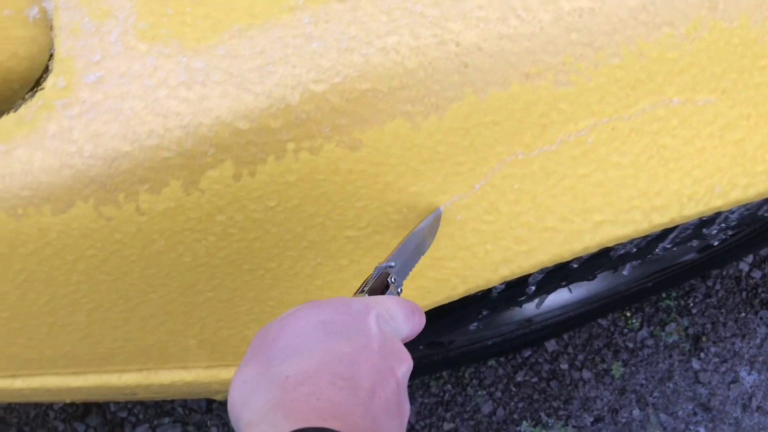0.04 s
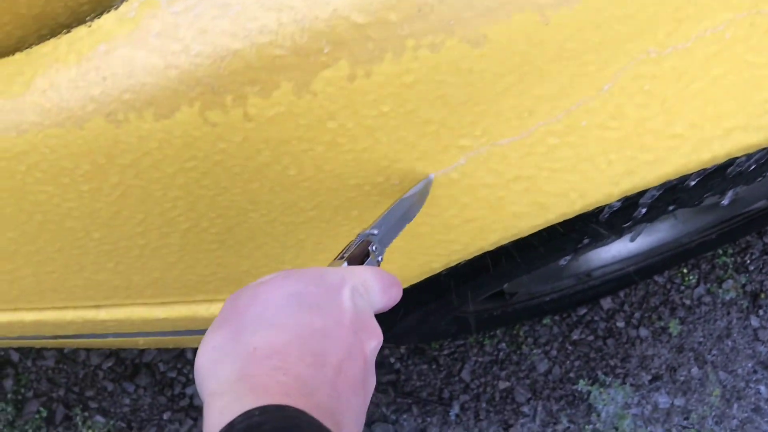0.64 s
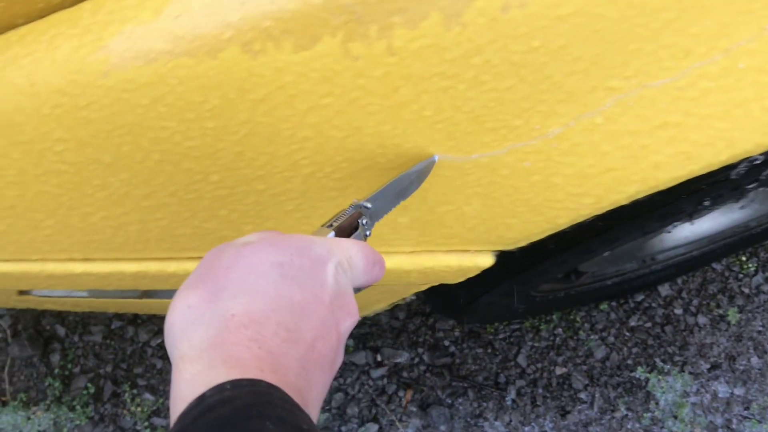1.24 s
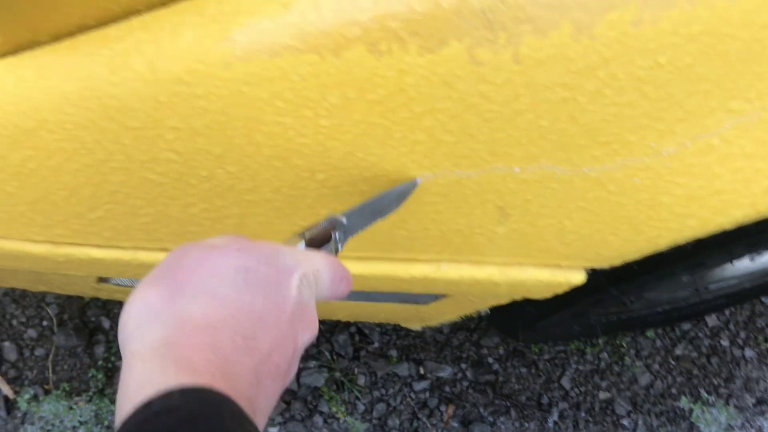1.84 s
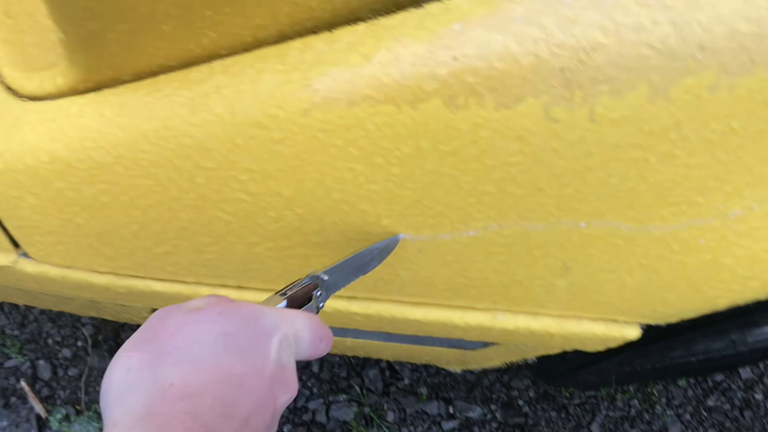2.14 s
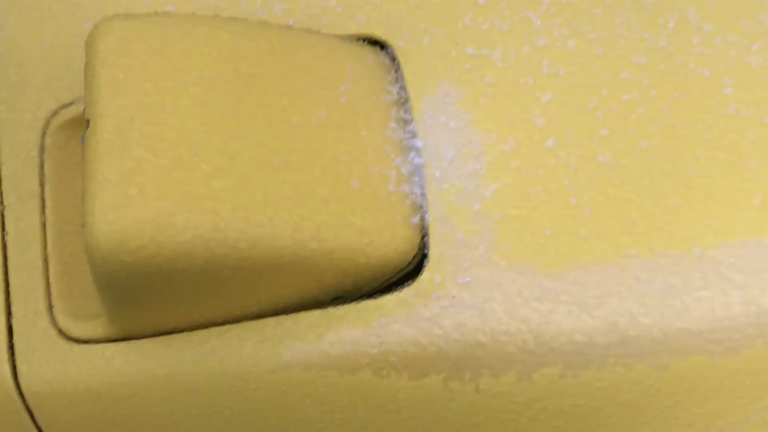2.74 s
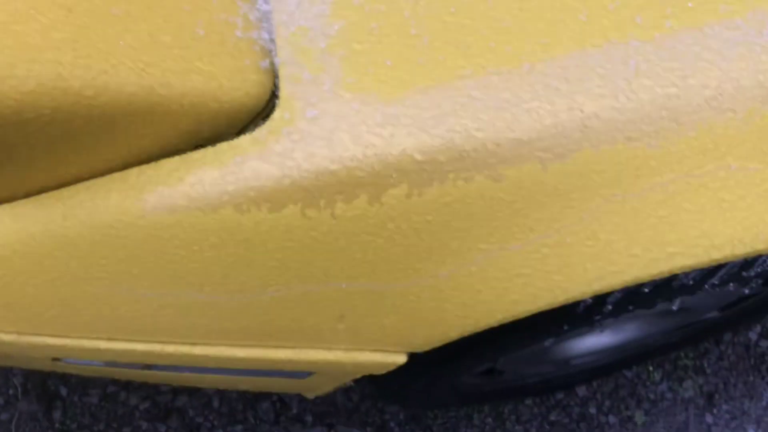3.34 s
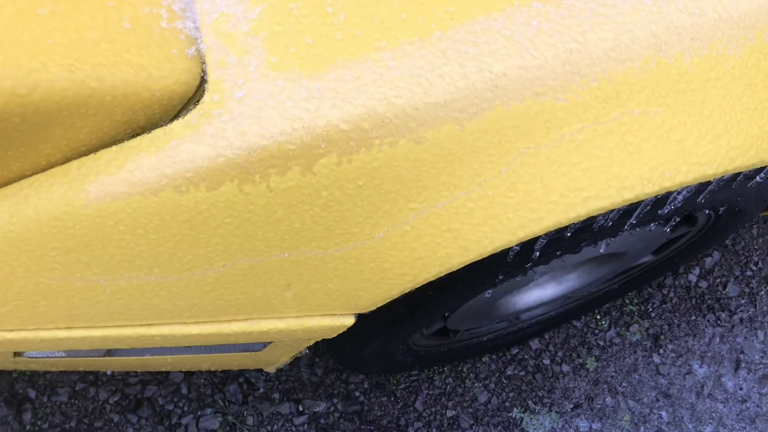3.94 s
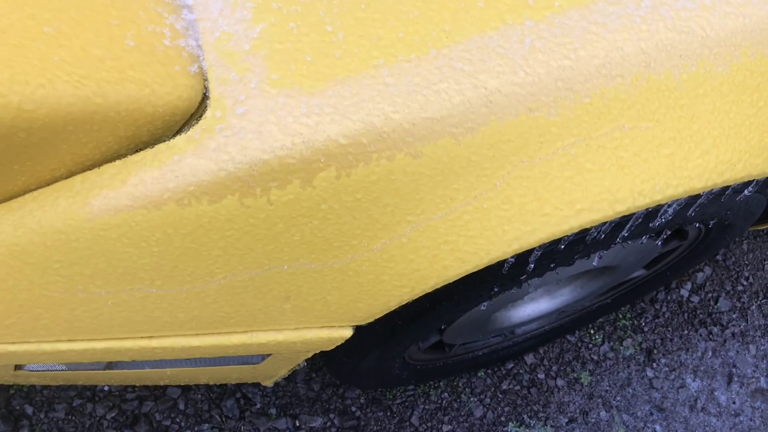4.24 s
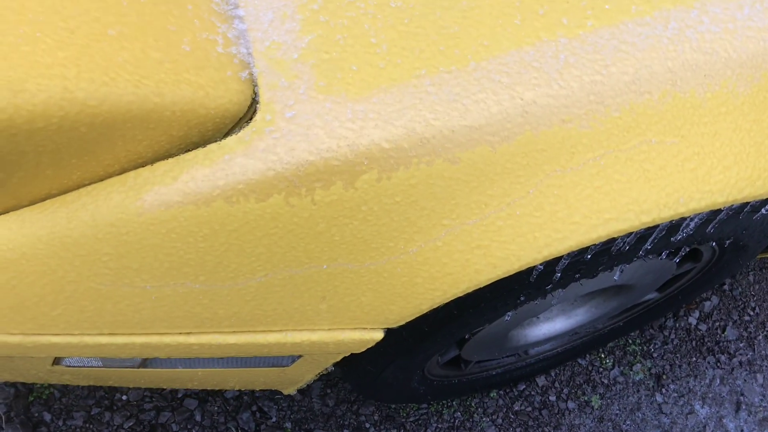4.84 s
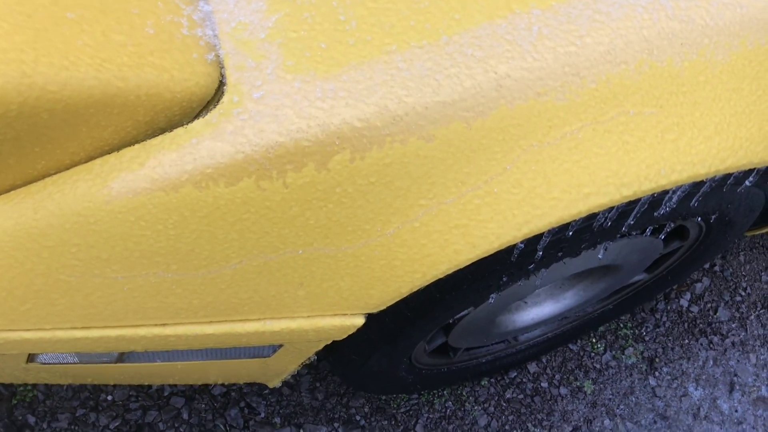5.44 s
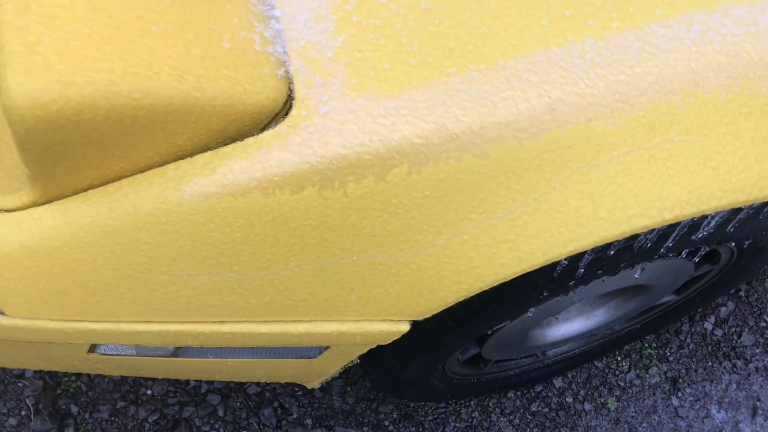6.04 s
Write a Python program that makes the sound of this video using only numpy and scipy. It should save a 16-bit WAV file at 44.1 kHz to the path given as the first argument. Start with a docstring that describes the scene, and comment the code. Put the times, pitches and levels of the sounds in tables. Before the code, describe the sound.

Close by and outdoors, a knife tip drags through gritty ice on a car's wing in four strokes. It sticks and slips in a rapid chatter, each slip crunching the ice, jarring the blade and knocking the sheet metal. The tip skids off with a brief hiss. A sleeve rustles with a few soft bumps, then tiny icy ticks and faint taps dot the quiet air.

```python
"""A knife tip is dragged in four strokes through gritty ice on a car's wing, close by, outdoors.
The tip chatters along, sticking and slipping, and now and then catches hard. Each slip crunches ice,
jars the blade and knocks the sheet metal; at last the tip skids off. Then the arm draws back with
soft bumps and a sleeve rustle, and tiny icy ticks and faint taps dot the quiet air."""
import sys
import numpy as np
from scipy import signal
from scipy.fft import rfft, irfft
from scipy.io import wavfile
from scipy.ndimage import uniform_filter1d

SR = 44100
rng = np.random.default_rng(int(sys.argv[2]) if len(sys.argv) > 2 else 0)


def output_pcm(signal):
    """Save a mono or channel-first signal as 16-bit PCM at the path in sys.argv[1].

    Samples are clipped to [-1, 1] before scaling.
    """
    pcm = np.clip(np.atleast_2d(signal).T, -1, 1) * 32767
    wavfile.write(sys.argv[1], SR, np.round(pcm).astype(np.int16))


N = 268128
TIME = np.arange(N) / SR

# Levels in the tables are relative: the functions set how loud each layer ends up.
# The hand's strokes, one list each. Each row: time in seconds, pressure in dB, slips a second.
STROKES = [
    [(.004, -1.5, 85), (.055, -6.5, 226), (.11, -15, 70), (.16, -0.5, 107), (.2, -6.5, 84.3),
     (.265, -1, 126), (.38, -5.5, 86.5), (.437, -0.5, 71)],
    [(.5014, -2, 50), (.565, -0.5, 117), (.65, -2.5, 109), (.675, -32.5, 40)],
    [(.8445, -4, 69), (.96, 1.5, 139.4), (1.025, 2, 59.3), (1.215, -3.5, 70.5), (1.24, -9, 84),
     (1.325, 1, 101), (1.385, -13.5, 50), (1.58, 0.5, 84), (1.625, 2, 97)],
    [(1.6836, -9.5, 28.5), (1.79, -15, 20.4), (1.91, -5, 73.6), (2.05, -5.5, 49.7), (2.115, 1, 97),
     (2.215, -7.5, 98.4), (2.245, 2.5, 93), (2.289, 4.5, 137)],
]
# The tip catches hard and breaks free. Each row: time in seconds, then crunch, blade and knock in dB.
CATCHES = [(.0041, -14.5, -26, -23), (0.0328, -23.5, -22, -24.5), (0.051, -15, -28.5, -19),
           (0.0842, -13, -24.5, -27), (0.1077, -17, -21.5, -20), (0.127, -18, -33, -27),
           (0.2403, -13.5, -28.5, -20), (.2546, -12, -19, -19), (0.2599, -20, -19, -23.5),
           (0.3007, -13.5, -24, -22), (0.3086, -22.5, -29, -30), (0.3429, -16, -26, -24),
           (.3671, -23, -28, -26), (0.3924, -22, -27, -25.5), (0.4377, -16.5, -27, -26),
           (0.5257, -20.5, -20, -25), (0.539, -16.5, -21, -30), (0.5912, -19.5, -17.5, -17.5),
           (0.6175, -17.5, -24, -21.5), (0.6312, -16.5, -20, -19), (0.6744, -21.5, -28.5, -17.5),
           (0.8595, -19, -18, -19.5), (0.8741, -25.5, -23, -35), (0.9026, -22.5, -22, -16),
           (0.9223, -16, -23, -19), (.949, -16, -22, -18.5), (.987, -21, -24, -21),
           (1.0099, -15.5, -25, -24.5), (1.047, -22.5, -27, -25), (1.1391, -18, -20.5, -18),
           (1.1658, -18.5, -17.5, -23), (1.1758, -17, -30, -17.5), (1.206, -18, -18.5, -18),
           (1.216, -18.5, -22.5, -30), (1.2776, -19.5, -22, -24), (1.325, -17.5, -16, -20.5),
           (1.338, -19.5, -21, -20.5), (1.3637, -21, -24.5, -15.5), (1.3975, -22.5, -17.5, -10.5),
           (1.4407, -22, -23.5, -19.5), (1.4634, -20.5, -18.5, -15), (1.5072, -20, -21, -17),
           (1.5286, -22, -27.5, -24.5), (1.548, -16.5, -15, -20.5), (1.5659, -21.5, -17.5, -24),
           (1.622, -24, -19.5, -13), (1.7017, -20, -21.5, -22.5), (1.7519, -18, -19, -15.5),
           (1.8152, -16, -19, -21), (1.8412, -18.5, -24, -12.5), (1.891, -20, -22.5, -17),
           (1.9055, -19.5, -29, -27), (1.932, -20, -27, -18.5), (1.9562, -16, -14.5, -10.5),
           (2.0128, -22.5, -20.5, -19.5), (2.0627, -23, -25, -16), (2.096, -18.5, -19, -24),
           (2.1107, -18, -25, -24.5), (2.1915, -21.5, -20.5, -16.5), (2.2572, -16.5, -17, -26)]
# Tone colours of ice and metal, on the stiff wheel arch and on the open panel behind it,
# and of the blade. Each row: frequency in Hz, level in dB.
ICE_ON_ARCH = [(1500, -37), (3700, -23.5), (5200, -1), (6200, -14.5), (7300, -6), (8100, -17.5),
               (8700, -3.5), (9200, -5.5), (10400, -15), (11500, -5), (12700, -2.5), (13400, -2.5),
               (14500, 1), (15300, -8.5), (16800, -31)]
ICE_ON_PANEL = [(1500, -54), (4200, -6), (4700, -8.5), (5750, -8), (6200, -3), (7500, -15.5), (8600, -12),
                (9450, -4), (10400, -9.5), (13000, -3), (13700, -2), (14500, 0.5), (15200, -1.5),
                (16000, -22.5), (16800, -27)]
ARCH_COLOUR = [(25, -38), (110, -20), (200, -3), (300, -6), (480, -7), (680, -3.5), (890, 5), (1150, 0.5),
               (1700, -11.5), (3500, -43.5)]
PANEL_COLOUR = [(25, -51), (125, -34.5), (165, -17), (205, -3), (290, -3.5), (380, -7.5), (490, -11.5),
                (680, -5), (900, 4), (1100, -1.5), (1400, -6), (1700, -16.5), (3500, -38)]
BLADE_COLOUR = [(300, -54), (1650, -17.5), (2000, -6), (2380, 1.5), (2700, -1.5), (3100, 1), (3550, -5),
                (3950, -10), (4600, -8.5), (5500, -18.5), (8000, -39.5)]
# The sheet metal's strongest notes. Each row: pitch in Hz, level in dB, seconds to fade by 60 dB.
PANEL_NOTES = [(193.7, -0.5, 0.32), (233, -2, 0.098), (272.6, 0.5, 0.2), (280.6, -6.5, 0.33),
               (330, -5.5, .14), (760, -2.5, 0.061), (885, -1, .08), (1043.3, 3, 0.079), (1094, 1.5, .08),
               (1180, -6, 0.064)]
# Bending waves bounce back from the panel's edges. Each row: delay in seconds, share that returns.
EDGE_ECHOES = [(.0023, 0.055), (.0039, -0.3), (.0056, -0.19)]
# Dense ringing of panel and blade. Each row: frequency in Hz, seconds to fade by 60 dB.
RING_TIMES = [(150, 0.36), (400, 0.098), (1000, 0.089), (2600, 0.04), (7000, 0.053), (15000, 0.014)]
# Tone colours of the air, skid, sleeve and frost. Each row: frequency in Hz, level in dB.
AIR_COLOUR = [(15, -39.5), (25, -2.5), (80, 1.5), (235, -10.5), (316, -9), (500, -17.5), (929, -17.5),
              (1470, -22.5), (4210, -22), (7630, -24.5), (10500, -25.5), (14200, -17), (15800, -26.5)]
SKID_COLOUR = [(30, -51.5), (100, -30), (220, -13.5), (500, -19.5), (900, -6.5), (1600, -13.5), (2400, 2.5),
               (3000, -5.5), (4200, -6.5), (7500, -8), (9400, -1), (10600, -8), (14500, 4), (15300, -3.5),
               (16000, -31)]
SLEEVE_COLOUR = [(60, -20.5), (200, -2.5), (370, 0.5), (700, -3.5), (1100, -5), (2000, -11.5),
                 (5000, -21.5), (15000, -33)]
FIZZ_COLOUR = [(1000, -1), (3500, -1), (7000, -2), (10500, -2.5), (14500, -4), (15600, -14), (16200, -27)]
# The last fast skid. Each row: time in seconds, level in dB, slips a second.
SKID = [(2.289, -30, 145), (2.295, -13, 218), (2.312, -14.5, 250), (2.33, -15, 300), (2.337, -10, 260),
        (2.34, -23, 220), (2.344, -25.5, 260)]
# Sleeve swishes. Each row: time of the peak in seconds, level in dB, seconds to fall to 37%.
SWISHES = [(2.369, -54.5, 0.038), (2.8, -54, 0.31), (3.113, -43.5, 0.029), (3.256, -54.5, 0.066),
           (4.1, -68, 0.73)]
# Soft bumps of the hand. Each row: time in seconds, level in dB, pitch in Hz, half length in seconds.
BUMPS = [(2.529, -43, 116, 0.01), (2.549, -35.5, 53, 0.017), (2.646, -48.5, 53.3, 0.038),
         (3.152, -40.5, 135, 0.0027)]
# Faint frosty fizz. Each row: time in seconds, level in dB.
FIZZ_LEVELS = [(2.36, -54), (2.85, -53.5), (3.3, -58.5), (3.55, -79), (3.8, -63.5), (4.35, -54), (4.7, -63),
               (6.08, -71.5)]
# The clearest icy ticks. Each row: time in seconds, level in dB, pitch in Hz.
CLEAR_TICKS = [(2.6834, -38, 11000), (2.778, -39, 2570), (2.8105, -38, 14000), (3.2994, -35, 14600),
               (3.3422, -36.5, 12300), (3.8637, -36, 11700), (4.0213, -38.5, 6160), (4.16, -38.5, 8400),
               (4.2544, -32, 4400), (4.7551, -38.5, 2410), (4.8804, -34.5, 11900), (4.974, -43, 3580),
               (5.1708, -30.5, 14100), (5.1931, -35.5, 14040), (5.2859, -33.5, 14200), (5.5844, -37, 13300),
               (5.9943, -36, 8570), (6.0244, -37, 14100)]
# Light taps on the bodywork. Each row: time in seconds, level in dB.
TAPS = [(3.832, -56), (4.074, -54), (4.684, -57), (4.947, -55), (5.221, -60), (5.824, -58)]

ARCH_UNTIL_S = .78  # the tip leaves the wheel arch
LEAD_S = .006  # a burst's faint creep starts this long before it breaks
STICK_S = .008  # the tip sticks this long before a hard catch


def amp(db):
    """Turns decibels into a gain."""
    return 10 ** (np.asarray(db) / 20)


def unit_rms(x):
    """Scales to an average power of 1."""
    return x / np.sqrt(np.mean(x ** 2) + 1e-20)


def unit_energy(x):
    """Scales to a total energy of 1."""
    return x / (np.linalg.norm(x) + 1e-20)


def value_at(points, hz):
    """Reads between (Hz, value) points, spaced by octaves."""
    f, value = np.transpose(points)
    return np.interp(np.log(hz + 1), np.log(f + 1), value)


def envelope(rows):
    """Gain over time from (seconds, dB) rows, silent outside them."""
    s, db = np.transpose(rows)[:2]
    return uniform_filter1d(amp(np.interp(TIME, s, db, left=-140, right=-140)), size=60)


def add(mix, s, sound):
    """Mixes a sound in at s seconds."""
    start = round(s * SR)
    sound = sound[max(-start, 0):]
    part = mix[max(start, 0):][:len(sound)]
    part += sound[:len(part)]


def response(points, size=4096):
    """How one click sounds through the given tone colour."""
    log_gain = np.log(amp(value_at(points, abs(np.fft.fftfreq(size, 1 / SR)))))
    spectrum = np.exp(np.conj(signal.hilbert(log_gain)))  # nothing sounds before the click
    return unit_energy(np.fft.ifft(spectrum).real[:size // 2])


def colour(x, points):
    """Filters x to the given tone colour."""
    return signal.oaconvolve(x, response(points))[:N]


def colour_by_place(x, arch, panel):
    """One tone colour while the tip is on the arch, another after it."""
    return np.where(TIME < ARCH_UNTIL_S, colour(x, arch), colour(x, panel))


def strike(force, body, db):
    """A burst of force sounds a body's click response, with a total energy of db."""
    return amp(db) * unit_energy(signal.fftconvolve(force, body))


def grains(per_s, spread_db):
    """Random clicks, mostly small, a few large."""
    size = amp(spread_db * np.minimum(rng.exponential(1, N), 4)) * rng.choice([-1, 1], N)
    return unit_rms(size * (rng.random(N) < per_s / SR))


def fracture(length_s, creep_db=-16, ragged_db=3):
    """Tiny breaks: a faint creep, then a burst that swells fast and dies away."""
    t = np.arange(SR // 40) / SR - LEAD_S
    age = np.maximum(t, 0) / max(length_s, 1e-4)
    shape = 2.6 * np.sqrt(age) * np.exp(-age) + amp(creep_db) * np.exp(-abs(t) / .00061)
    breaks, sizes = rng.standard_normal((2, len(t)))
    roughness = amp(ragged_db * unit_rms(uniform_filter1d(sizes, size=12)))
    return unit_energy(breaks * shape * roughness)


def chatter(max_run=24, uneven=.24, scatter_db=3.5):
    """Ordinary slips, in rows like CATCHES: an uneven run that restarts after each hard catch."""
    usual_db = np.array([-24.5, -25.5, -26.5])  # crunch, blade, knock
    rows, catches = [], np.transpose(CATCHES)[0]
    for stroke in STROKES:
        s, pressure_db, rate = np.transpose(stroke)
        marks = [s[0], *catches[(catches > s[0] + .01) & (catches < s[-1] - .01)], s[-1]]
        for start, end in zip(marks, marks[1:]):
            steps = max(round((end - start) * np.interp((start + end) / 2, s, rate)), 1)
            sliding_s = max(end - start - STICK_S, 0)
            caught = abs(catches - start).min() < .01
            for k, (late, *scatter) in enumerate(rng.standard_normal((max_run, 4))[:steps]):
                if k or not caught:
                    step = np.clip(k + uneven * late * (k > 0), 0, steps)
                    when = start + sliding_s * step / (steps - .5)
                    db = usual_db + np.interp(when, s, pressure_db) + scatter_db * np.array(scatter)
                    rows.append((when, *db))
    return rows


def spring_back(break_s, knock_db):
    """The dented panel lets go with a sharp, ragged push; deeper dents are slower and sound duller."""
    push = amp(-7.5) * fracture(.93 * break_s, creep_db=-15, ragged_db=4)
    add(push, LEAD_S + .001, np.ones(1))
    cutoff_hz = np.clip(1600 * amp(-.55 * (knock_db + 23.5)), 200, 8000)
    return signal.lfilter(*signal.butter(1, cutoff_hz, fs=SR), push)


def slips():
    """Each slip crunches ice, jars the blade and lets the dented panel spring back."""
    ice, blade, knock, hum = np.zeros((4, N))
    arch_bodies = response(ICE_ON_ARCH), response(ARCH_COLOUR)
    panel_bodies = response(ICE_ON_PANEL), response(PANEL_COLOUR)
    blade_body = response(BLADE_COLOUR)
    hz, note_db, fade_s = np.transpose(PANEL_NOTES)[:, :, None]
    t = np.arange(SR // 3) / SR
    notes = amp(note_db - 60 * t / fade_s) * np.cos(2 * np.pi * hz * t) * np.minimum(t / .003, 1)
    rows = CATCHES + chatter()
    for s, ice_db, blade_db, knock_db in rows:
        on_arch = s < ARCH_UNTIL_S
        ice_body, metal_body = arch_bodies if on_arch else panel_bodies
        # the more the panel gives way, the longer the ice takes to break
        break_s = .0019 * amp(.25 * (knock_db - ice_db) + 1.5 * rng.standard_normal())
        crunch = fracture(.39 * break_s, creep_db=-18, ragged_db=5.5)
        add(ice, s - LEAD_S, strike(crunch, ice_body, ice_db + 23))
        jar = fracture(.47 * break_s, creep_db=-16.5, ragged_db=2)
        add(blade, s - LEAD_S + .0004, strike(jar, blade_body, blade_db + 21.5))
        push = spring_back(break_s, knock_db)
        add(knock, s - LEAD_S, strike(push, metal_body, knock_db + 21.5))
        # each spot mixes the notes differently; the stiff arch holds the low ones back
        shares = rng.choice([-1, 1], len(notes)) * rng.uniform(.96, 1.7, len(notes))
        shares *= amp(-7 * on_arch * (hz[:, 0] < 500))
        add(hum, s + .002, amp(knock_db) * (shares @ notes))
    ice += flakes(rows)
    panel = knock.copy()
    for delay, share in EDGE_ECHOES:
        add(panel, delay, share * (knock + .5 * blade))
    tails = ringing(amp(-17) * ice + amp(-10.5) * blade + amp(-2.5) * knock)
    return ice + blade + panel + tails + amp(-22.5) * hum


def flakes(slip_rows):
    """A small flake of ice snaps off just before or after each slip."""
    snaps = np.zeros(N)
    for (s, ice_db, *_), (offset, size) in zip(slip_rows, rng.uniform(-1, 1, (400, 2))):
        snap = amp(ice_db + 12 + 5.5 * size) * fracture(.0006, creep_db=-19, ragged_db=3.5)
        add(snaps, s - LEAD_S + .006 * (offset + .37), snap)
    return colour_by_place(snaps, ICE_ON_ARCH, ICE_ON_PANEL) + amp(-1) * colour(snaps, BLADE_COLOUR)


def ringing(x, patterns=4):
    """Panel and blade ring on in many dying notes, whose pattern shifts as the tip travels."""
    out = np.zeros(N)
    for k in range(patterns):
        hz, t, noise = signal.stft(rng.standard_normal(SR // 3), SR, nperseg=128)
        fade_s = np.maximum(value_at(RING_TIMES, hz), .005)[:, None]
        tail = signal.istft(noise * amp(-60 * t / fade_s) / np.sqrt(fade_s), SR, nperseg=128)[1]
        tail *= 1 - np.exp(-np.arange(len(tail)) / SR / .00055)  # soften the start
        share = np.cos(np.pi * (3.063 * TIME + k / patterns)) * np.sqrt(2 / patterns)
        out += signal.oaconvolve(x * share, unit_energy(tail))[:N]
    return out


def stroke_effort(stroke):
    """How strongly one stroke grinds over time: more when it is harder and faster."""
    s, pressure_db, rate = np.transpose(stroke)
    speed = np.interp(TIME, s, np.maximum(rate, 1), left=0, right=0) / 100
    return amp(np.interp(TIME, s, pressure_db)) * speed ** 1.2


def grinding(fade_s=.015, stick_db=-8):
    """Between slips the tip judders over fine grit, in crunches about a millisecond long."""
    effort = amp(-35) * uniform_filter1d(sum(map(stroke_effort, STROKES)), size=round(fade_s * SR))
    effort += amp(-60.5) * (TIME < SKID[0][0])  # even the resting tip rubs faintly
    for s, *_ in CATCHES:
        effort[max(round((s - STICK_S) * SR), 0):round(s * SR)] *= amp(stick_db)
    t = np.arange(SR // 100) / SR
    clumps = signal.oaconvolve(grains(per_s=290, spread_db=6) ** 2, t * np.exp(-t / .00041))[:N]
    judder = unit_rms(np.sqrt(unit_rms(abs(clumps))) + amp(-19.5))
    grit = rng.standard_normal(N) * judder * effort
    crunch = colour_by_place(grit, ICE_ON_ARCH, ICE_ON_PANEL)
    metal = colour_by_place(grit, ARCH_COLOUR, PANEL_COLOUR)
    sound = amp(-3) * crunch + amp(-4) * colour(grit, BLADE_COLOUR) + amp(-.5) * metal
    return sound + amp(-18.5) * ringing(sound)


def air(level_db=-61.5):
    """Quiet outdoor rumble and hiss."""
    return amp(level_db) * unit_rms(colour(rng.standard_normal(N), AIR_COLOUR))


def skid():
    """The tip speeds up until its slips merge into a hiss, then leaves the ice."""
    s, _, rate = np.transpose(SKID)
    slip_count = np.cumsum(np.interp(TIME, s, rate)) / SR
    pulses = unit_rms(.45 + np.exp(-(slip_count % 1) / .25))
    scrape = rng.standard_normal(N) * pulses * envelope(SKID)
    hiss = colour(scrape, SKID_COLOUR)
    return hiss + ringing(amp(-10) * hiss + amp(-18) * colour(scrape, BLADE_COLOUR))


def arm():
    """The sleeve rustles and the hand bumps softly as the arm draws back."""
    motion = sum(amp(db) * np.exp(-abs(TIME - s) / max(fade, .005)) for s, db, fade in SWISHES)
    out = amp(-2.5) * motion * colour(grains(per_s=5000, spread_db=1.5), SLEEVE_COLOUR)
    for s, db, hz, half_s in BUMPS:
        out += amp(db) * np.exp(-((TIME - s) / half_s) ** 2) * np.sin(2 * np.pi * hz * (TIME - s))
    return out


def ice_tick(hz):
    """One speck of ice: a short snap with a pitch of its own."""
    snap = fracture(.0018, creep_db=-20.5, ragged_db=7)
    f = np.fft.rfftfreq(len(snap), 1 / SR)
    octaves = np.log2((f + 1) / hz)
    narrow = 1 / (1 + (octaves / .11) ** 2)
    broad = amp(-7.5) / (1 + (octaves / 2) ** 4)
    return unit_energy(irfft(rfft(snap) * (narrow + broad) * amp(value_at(FIZZ_COLOUR, f))))


def ice_ticks(faint_count=130):
    """Specks of ice tick, a few clear and many faint, over a frosty fizz."""
    ticks = np.zeros(N)
    for s, db, hz in CLEAR_TICKS:
        add(ticks, s - LEAD_S + .00078, amp(db + 9.5) * ice_tick(hz))
    for when, strength, pitch in rng.random(size=(faint_count, 3)):
        add(ticks, when * N / SR, amp(-41 + 10 * strength ** 2) * ice_tick(3000 * 4.6 ** pitch))
    fizz = envelope(FIZZ_LEVELS) * colour(grains(per_s=9000, spread_db=2.5), FIZZ_COLOUR)
    return ticks + amp(-8.5) * ringing(ticks) + amp(-10.5) * fizz


def taps():
    """Faint dull taps sound the bodywork."""
    force = np.zeros(N)
    for s, db in TAPS:
        add(force, s - LEAD_S, amp(db + 18) * fracture(.004))
    thuds = colour(force, PANEL_COLOUR)
    return thuds + amp(-16) * ringing(thuds)


def scene():
    """All the sounds together, in one channel."""
    return (air() + arm() + taps() + ice_ticks() + skid() + grinding() + slips())[None]


def record(dry):
    """Clips any peaks beyond full scale, then cuts the highest treble."""
    lowpass = signal.firwin(401, cutoff=16700, window=("kaiser", 9), fs=SR)
    return signal.oaconvolve(np.clip(dry, -1, 1), lowpass[None], "same")


dry = scene()
out = record(dry)
output_pcm(out)
```